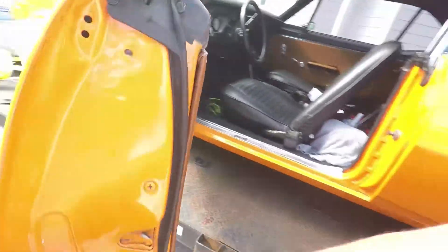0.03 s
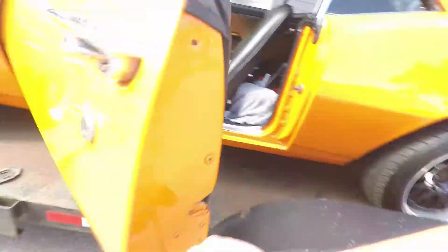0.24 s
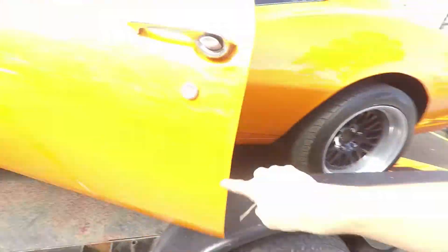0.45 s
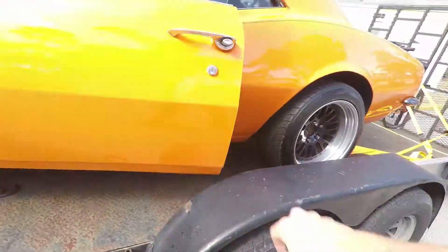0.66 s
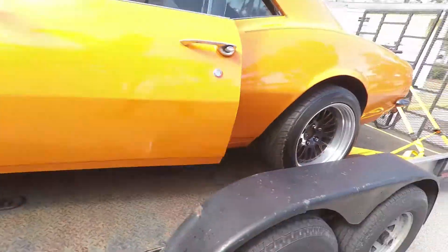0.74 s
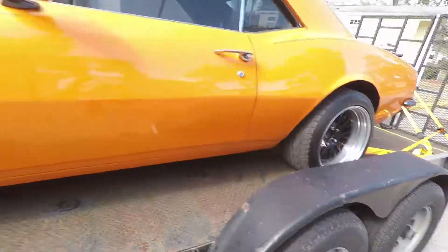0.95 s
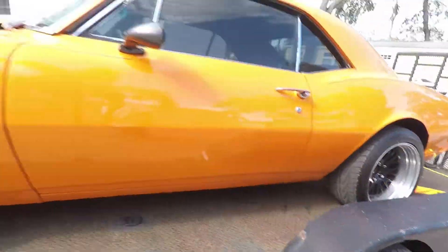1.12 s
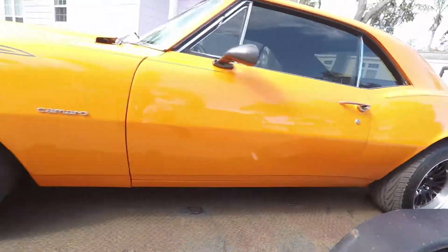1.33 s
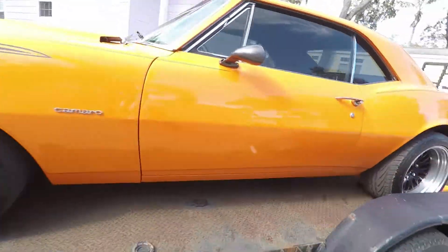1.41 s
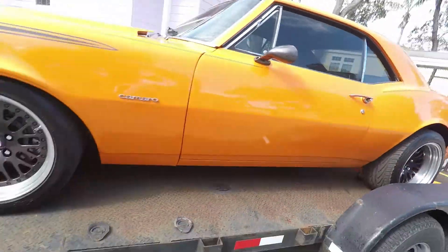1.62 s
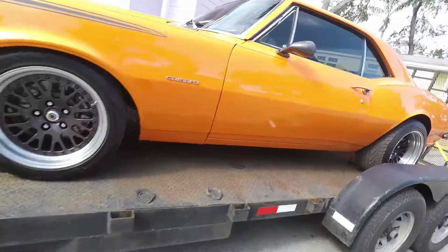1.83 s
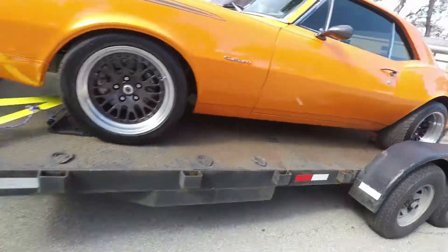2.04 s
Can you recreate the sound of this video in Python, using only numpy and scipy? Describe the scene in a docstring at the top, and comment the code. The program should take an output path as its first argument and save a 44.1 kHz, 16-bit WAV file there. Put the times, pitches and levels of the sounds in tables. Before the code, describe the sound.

Car door swings and slams with a solid clanging thud, parts rattling, over wind and low traffic

```python
"""Wind buffets a hand-held microphone over a low hum of traffic while a heavy steel car door swings with a faint rub.
The door of the old car, on a trailer outdoors, is then slammed: the latch strikes, the frame blow follows 17 ms later.
Panels ring, the cabin thumps, loose parts rattle and chatter, an echoing wash dies away and something squeaks faintly.
Blows, rattles, wind and traffic are shaped noise; panels and cabin are decaying sines; pops are filtered pulses."""
import sys
import numpy as np
from scipy import signal
from scipy.fft import rfft, irfft
from scipy.io import wavfile
from scipy.ndimage import uniform_filter1d

SR = 44100
rng = np.random.default_rng(int(sys.argv[2]) if len(sys.argv) > 2 else 0)


def pcm_store(signal):
    """Save signal as 16-bit PCM."""
    levels = np.round(np.clip(np.atleast_2d(signal), -1, 1) * 32767)
    wavfile.write(sys.argv[1], SR, levels.astype(np.int16).T)


N = 91154
T = np.arange(N) / SR
HZ = np.fft.rfftfreq(N, 1 / SR)


def amp(db):
    """Decibels to gain."""
    return 10 ** (np.asarray(db) / 20)


def unit(x):
    """Scales to rms 1."""
    return x / np.sqrt(np.mean(x ** 2) + 1e-20)


def read(points, hz=HZ):
    """Interpolates a spectrum table on a log-frequency axis."""
    table_hz, value = np.transpose(points)
    return np.interp(np.log(hz + 1), np.log(table_hz + 1), value)


def level(points):
    """Gain from a dB curve over time, -120 dB outside it."""
    return amp(np.interp(T, *np.transpose(points), left=-120, right=-120))


def noise(gain):
    """Noise of rms 1 with the given spectrum."""
    return unit(irfft(rfft(rng.standard_normal(N)) * gain, N))


def steady(x, seconds):
    """Evens out the power of a noise over the given time."""
    size = max(int(seconds * SR / 2), 3)
    power = uniform_filter1d(uniform_filter1d(x ** 2, size), size)
    return x / np.sqrt(abs(power) + 1e-9)


def bump(center_s, half_s):
    """Gaussian swell in time."""
    return np.exp(-.5 * ((T - center_s) / half_s) ** 2)


def strike(start_s, rise_s, t60_s, hold_s=0):
    """Linear attack, then exponential release; hold counts from the start."""
    attack = np.clip((T - start_s) / rise_s, 0, 1)
    return attack * amp(-60 * np.maximum(T - start_s - hold_s, 0) / t60_s)


def ring(modes, start_s, rise_s):
    """Decaying sines of random phase, set off at one moment."""
    out = np.zeros(N)
    for hz, db, t60_s in modes:
        sine = np.sin(2 * np.pi * (hz * T + rng.random()))
        out += amp(db) * strike(start_s, rise_s, t60_s) * sine
    return out


# traffic spectrum: (frequency [Hz], density [dB per Hz])
TRAFFIC_SPECTRUM = [(40, 16), (120, 16), (200, -3.5), (290, 2.5), (430, -13.5), (750, -13), (1300, -19.5),
                    (2300, -23), (5000, -28.5), (9000, -37.5), (15000, -43)]
TRAFFIC_TREBLE_DB = -59  # rms above 1 kHz


def traffic():
    """Steady distant wash, strongest in the lows."""
    wash = noise(amp(read(TRAFFIC_SPECTRUM)))
    treble = irfft(rfft(wash) * (HZ > 1000), N)
    return amp(TRAFFIC_TREBLE_DB) * wash / treble.std()


# wind strength, before WIND_GAIN_DB: (time [s], level [dB])
WIND_LEVEL = [(0.0, -43.5), (0.03, -23), (0.27, -45), (0.37, -23.5), (0.47, -27), (0.5, -19), (0.81, -11.5),
              (0.84, -24.5), (0.95, -18.5), (1.04, -29.5), (1.28, -26), (1.31, -11), (1.38, -36.5),
              (1.4, -14), (1.45, -28), (1.49, -16.5), (1.93, -21.5), (2.06, -19.5)]
# wind spectrum: (frequency [Hz], density [dB per Hz])
WIND_SPECTRUM = [(10, -11), (25, 2.5), (48, 3), (75, -1), (120, -9.5), (200, -22.5), (320, -32.5),
                 (500, -41), (1000, -67), (3000, -99)]
WIND_GAIN_DB, WIND_STEADY_S = 1, 0.18


def wind():
    """Low turbulence at the microphone: noise with a gusting level."""
    gust = amp(WIND_GAIN_DB + np.interp(T, *np.transpose(WIND_LEVEL)))
    return gust * steady(noise(amp(read(WIND_SPECTRUM))), WIND_STEADY_S)


# broad buffets: (time [s], level [dB], half length [s], corner [Hz])
BUFFETS = [(0.363, -18.5, 0.0054, 155), (0.413, -21.5, 0.0073, 128), (0.522, -21, 0.021, 289),
           (0.617, -14.5, 0.011, 243), (0.684, -17, 0.045, 143), (0.748, -15.5, 0.015, 134),
           (.793, -11, 0.0038, 478), (0.888, -19, 0.0064, 238), (1.315, -13.5, 0.0085, 109),
           (1.534, -13.5, 0.012, 205), (1.692, -24, 0.024, 137), (1.88, -25.5, 0.0039, 187),
           (1.965, -22.5, 0.0052, 230)]
BUFFET_LOW_HZ, BUFFET_SLOPE = 43.7, 3.44


def buffets():
    """Short, brighter eddies of the wind: band-limited noise in Gaussian swells."""
    out = np.zeros(N)
    for s, db, half_s, corner_hz in BUFFETS:
        low_cut = HZ / (HZ + BUFFET_LOW_HZ)
        eddy = noise(low_cut / np.sqrt(1 + (HZ / corner_hz) ** (2 * BUFFET_SLOPE)))
        out += amp(db) * steady(eddy, 0.047) * bump(s, half_s)
    return out


# pops of air at the microphone port: (time [s], peak [dB], bandwidth [Hz])
POPS = [(.484, -23, 480), (0.503, -15.5, 397), (.512, -9, 233), (0.5225, -12, 408), (.596, -13.5, 424),
        (.607, -5, 292), (.6125, -11, 566), (.6215, -10.5, 484), (.626, -4.5, 300), (.767, -15.5, 520),
        (.7902, -10, 897), (.7955, -6.5, 403), (.851, -21, 412), (.884, -24.5, 395), (.981, -14.5, 162),
        (1.236, -13.5, 330), (1.4055, -3.5, 351), (1.5015, -9.5, 704), (1.506, -5.5, 261),
        (1.5103, -10, 311), (1.5305, -8.5, 310), (1.538, -2, 291), (1.574, -4.5, 248.5),
        (1.668, -23.5, 428), (1.6925, -13.5, 156), (1.96, -13, 280)]
POP_LOW_HZ, POP_STEEPNESS = 91, 1.59


def pops():
    """Single eddies cross the microphone port: brief rounded pulses that pull and push in turn."""
    out = np.zeros(N)
    for k, (s, db, hz) in enumerate(POPS):
        shape = HZ / (HZ + POP_LOW_HZ) * np.exp(-(HZ / hz) ** POP_STEEPNESS)
        pulse = irfft(shape * np.exp(-2j * np.pi * HZ * s), N)
        out -= (-1) ** k * amp(db) * pulse / abs(pulse).max()
    return out


# rub of the swinging door: (time [s], level [dB])
RUB_LEVEL = [(0, -49.5), (.05, -47), (.11, -54.5), (.16, -50), (.19, -54.5), (.21, -46.5), (.23, -55),
             (.36, -71)]
# rub spectrum: (frequency [Hz], density [dB per Hz])
RUB_SPECTRUM = [(300, -3), (700, 2), (1500, -11.5), (2200, -1.5), (3000, -15.5), (3700, -15.5), (8000, -29),
                (12000, -25.5), (15000, -37)]
# thin hinge tones: (time [s], level [dB], half length [s], frequency [Hz], width [Hz])
HINGE_TONES = [(0.078, -52.5, 0.059, 2200, 81), (0.156, -58.5, 0.021, 3290, 110)]


def hinge():
    """The hinge rubs (broad noise) and sings thinly (narrow noise) as the door starts to swing."""
    out = level(RUB_LEVEL) * noise(amp(read(RUB_SPECTRUM)))
    for s, db, half_s, hz, width_hz in HINGE_TONES:
        tone = noise(1 / (1 + (2 * (HZ - hz) / width_hz) ** 2))
        out += amp(db) * steady(tone, 0.02) * bump(s, half_s)
    return out


# squeak pitch: (time [s], fundamental [Hz])
SQUEAK_PITCH = [(1.02, 1300), (1.11, 1350.5), (1.17, 1444), (1.21, 1443.5), (1.237, 1369.5), (1.29, 1367),
                (1.37, 1411)]
# squeak partials: (multiple, width [Hz], [(time [s], level [dB])])
SQUEAK_PARTIALS = [(1, 100, [(1.0, -44), (1.04, -34), (1.09, -51), (1.2, -44), (1.225, -58), (1.248, -36),
                   (1.29, -47.5), (1.34, -54.5), (1.38, -50.5), (1.44, -69)]), (2, 180, [(1.225, -72),
                   (1.243, -45.5), (1.27, -62), (1.33, -70)]), (3, 120, [(1.23, -79), (1.263, -43.5),
                   (1.288, -49.5), (1.33, -76)])]
SQUEAK_STEADY_S, FUZZ_HZ = 0.066, 2000


def squeak():
    """A faint rough squeak as the car rocks: gliding partials of narrow noise, each with its own swells."""
    turns = np.cumsum(np.interp(T, *np.transpose(SQUEAK_PITCH))) / SR
    out = np.zeros(N)
    for multiple, width_hz, points in SQUEAK_PARTIALS:
        band = noise(1 / (1 + ((HZ - FUZZ_HZ) / (width_hz / 2)) ** 2))
        # shift the band to 0 Hz, then up to the gliding partial
        fuzz = signal.hilbert(band) * np.exp(-2j * np.pi * FUZZ_HZ * T)
        partial = (fuzz * np.exp(2j * np.pi * multiple * turns)).real
        out += level(points) * steady(partial, SQUEAK_STEADY_S)
    return out


# wash of body ring and yard echo: (frequency [Hz], density [dB per Hz])
TAIL_SPECTRUM = [(120, -13.5), (200, -3), (309, -7), (647, -15.5), (789, -13), (1050, -24.5), (1330, -11.5),
                 (1600, -38), (1850, -22), (3800, -31), (5860, -33), (15000, -36.5)]
# wash decay: (frequency [Hz], t60 [s])
TAIL_T60 = [(200, 0.81), (700, 0.54), (1400, 0.48), (3000, 0.5), (6000, 0.4), (14000, 0.16)]
TAIL_S, TAIL_DB, TAIL_RISE_S = 0.9274, -18, 0.0047
TAIL_GRAIN_DB, TAIL_GRAIN_S, TAIL_FLUTTER_DB = 1, 0.0012, 2.0


def tail():
    """Dense chatter of the body and scattered echoes: grainy noise, its highest treble dying first."""
    grain = unit(uniform_filter1d(rng.standard_normal(N), max(int(TAIL_GRAIN_S * SR), 2)))
    wash = unit(noise(amp(read(TAIL_SPECTRUM))) * amp(TAIL_GRAIN_DB * grain))
    hz, t, bands = signal.stft(wash, SR, nperseg=256)
    flutter = unit(uniform_filter1d(rng.standard_normal(len(t)), size=3))
    decay_db = -60 * np.maximum(t - TAIL_S, 0) / read(TAIL_T60, hz)[:, None]
    bands = bands * amp(TAIL_FLUTTER_DB * flutter + decay_db)
    attack = np.clip((T - TAIL_S) / TAIL_RISE_S, 0, 1)
    return amp(TAIL_DB) * attack * signal.istft(bands, SR, nperseg=256)[1][:N]


# spectrum of small metal parts: (frequency [Hz], density [dB per Hz])
RATTLE_SPECTRUM = [(200, -17), (1000, 8), (2500, -0.5), (6000, -10), (10000, -20), (15000, -29.5)]
HIT_RISE_S = 0.0025  # attack of chatter and door blows
CHATTER_S, CHATTER_DB, CHATTER_T60_S = .938, -25, .3
CHATTER_PER_S, CHATTER_SPREAD_DB, TICK_T60_S = 670, 2.5, 0.0029


def chatter():
    """Linkages inside the door tick irregularly as they settle: random short noise bursts under one decay."""
    spread = amp(CHATTER_SPREAD_DB * np.clip(rng.standard_normal(N), -2, 2))
    ticks = (rng.random(N) < CHATTER_PER_S / SR) * spread
    bursts = signal.lfilter([1], [1, -amp(-60 / (TICK_T60_S * SR))], ticks)
    metal = unit(bursts * noise(amp(read(RATTLE_SPECTRUM))))
    return amp(CHATTER_DB) * metal * strike(CHATTER_S, HIT_RISE_S, CHATTER_T60_S)


# rattles of latch and window: (time [s], level [dB], t60 [s], ring [Hz], ring relative to broad noise [dB])
RATTLES = [(0.895, -36, 0.079, 1430, -2), (0.9354, -6, 0.024, 754, -7), (0.944, -17.5, 0.02, 8630, 14),
           (0.9536, -20, 0.034, 8300, -1.5), (.961, -23, 0.057, 1250, 0), (0.972, -19.5, 0.031, 5100, -12),
           (1.003, -25, 0.012, 6000, 13), (1.0097, -29, 0.033, 5400, -1), (1.056, -28.5, 0.034, 5500, -9.5),
           (1.093, -41, 0.25, 7940, -20), (1.256, -49, 0.67, 2240, -1.5), (1.43, -45.5, 0.25, 4600, -13),
           (1.4465, -28, 0.0062, 2430, 6.5)]


def rattles(width_hz=450, rise_s=0.0002):
    """Small metal parts clack: decaying noise, each with one broad resonance."""
    out = np.zeros(N)
    for s, db, t60_s, hz, ring_db in RATTLES:
        resonance = noise(1 / (1 + ((HZ - hz) / width_hz) ** 2))
        clack = noise(amp(read(RATTLE_SPECTRUM))) + amp(ring_db) * resonance
        out += amp(db) * unit(clack) * strike(s, rise_s, t60_s)
    return out


# low modes of cabin and body: (frequency [Hz], level [dB], t60 [s])
CABIN_MODES = [(27.6, 1, 0.12), (45.9, -13, 0.46), (71.5, -12, 0.23), (118.5, -13.5, 0.34),
               (135, -16.5, 0.39), (173, -22, 0.66), (210, 6.5, 0.025), (256, -22, 0.39),
               (287, -28.5, 0.25)]
CABIN_S, CABIN_RISE_S = .9355, 0.0057


def cabin():
    """The closing door shoves the cabin air and the body: a low thump of decaying sines in phase."""
    out = np.zeros(N)
    for hz, db, t60_s in CABIN_MODES:
        sine = np.sin(2 * np.pi * hz * (T - CABIN_S))
        out -= amp(db) * strike(CABIN_S, CABIN_RISE_S, t60_s) * sine
    return out


# latch, then frame: (time [s], crack [dB], ring gain [dB], hold [s], crack t60 [s],
# treble boost [dB], body boost [dB])
BLOWS = [(0.911, -10.5, -18, 0.0047, 0.048, -3.5, -13), (0.9281, -8.5, -16.5, 0.0036, 0.074, 6, -0.5)]
# crack spectrum before boosts: (frequency [Hz], density [dB per Hz])
CRACK_SPECTRUM = [(240, -18), (500, -8), (800, -1.5), (1100, -12), (1700, -12), (2300, -5.5), (3200, -12),
                  (4000, -17), (5200, -10), (6300, -19.5), (10000, -30), (15000, -37)]
# clang of the door skin in every blow: (frequency [Hz], width [Hz], boost [dB])
CLANG = [(846, 290, 5.5), (1257, 280, 13.5)]
# door panel modes, before ring gain and body boost: (frequency [Hz], level [dB], t60 [s])
PANEL_MODES = [(360, -10.5, .25), (478, -30, 0.2), (539, -6.5, 0.154), (705, 0.5, 0.12), (811, -0.5, 0.23),
               (844, -12, 0.04), (904, 0, 0.08), (1018, -13, 0.26), (1140, -12, 0.34), (1250, -5.5, 0.11),
               (1338, -12, .17), (1316, -15, .45), (1400, -8, 0.15), (1559, -10, 0.11), (1750, -14, 0.21),
               (2450, -21, .14)]
TREBLE_HZ, BODY_HZ = 7000, 600  # treble boost above, body boost below


def door():
    """Latch and frame blows: a dense metal crack of noise, coloured by the clang, and the ringing panel."""
    colour_db = read(CRACK_SPECTRUM)
    for hz, width_hz, boost_db in CLANG:
        colour_db = colour_db + boost_db / (1 + (2 * (HZ - hz) / width_hz) ** 2)
    treble = 1 - 1 / (1 + (HZ / TREBLE_HZ) ** 10)
    body = 1 / (1 + (HZ / BODY_HZ) ** 10)
    out = np.zeros(N)
    for s, crack_db, ring_db, hold_s, t60_s, treble_db, body_db in BLOWS:
        crack = noise(amp(colour_db + treble_db * treble + body_db * body))
        out += amp(crack_db) * steady(crack, 0.0047) * strike(s, HIT_RISE_S, t60_s, hold_s)
        modes = [(hz, db + body_db * (hz < BODY_HZ), mode_t60_s) for hz, db, mode_t60_s in PANEL_MODES]
        out += amp(ring_db) * ring(modes, s, HIT_RISE_S)
    return out


def scene():
    """Swing, slam and after-sounds in the wind, as one channel."""
    background = traffic() + wind() + buffets() + pops()
    after_sounds = squeak() + tail() + chatter() + rattles()
    return (background + hinge() + after_sounds + cabin() + door())[None]


CEILING, EDGE_HZ = .97, 15400


def record(dry):
    """Soft overload, then a low-pass band limit."""
    limited = dry / (1 + (dry / CEILING) ** 6) ** (1 / 6)
    low_pass = signal.firwin(401, EDGE_HZ, window=("kaiser", 8), fs=SR)
    return signal.oaconvolve(limited, low_pass[None], "same")


dry = scene()
out = record(dry)
pcm_store(out)
```